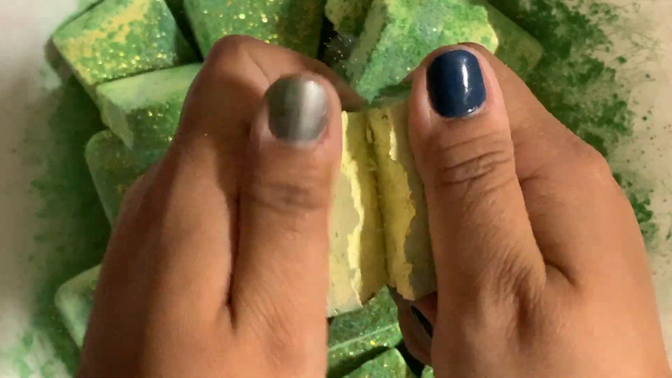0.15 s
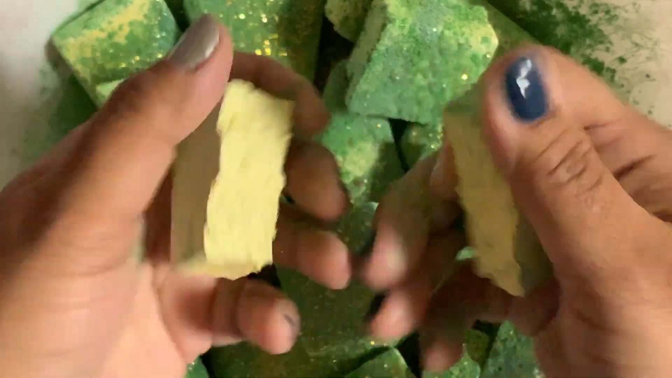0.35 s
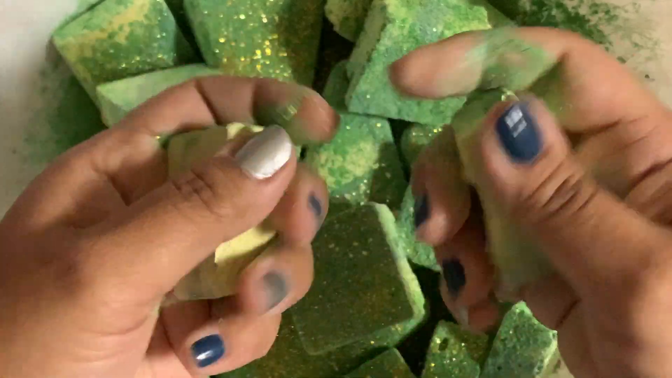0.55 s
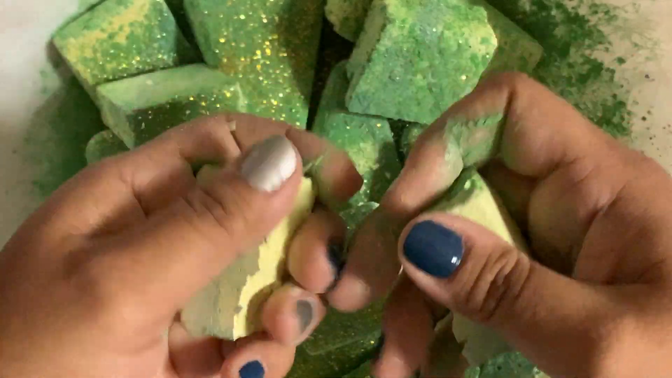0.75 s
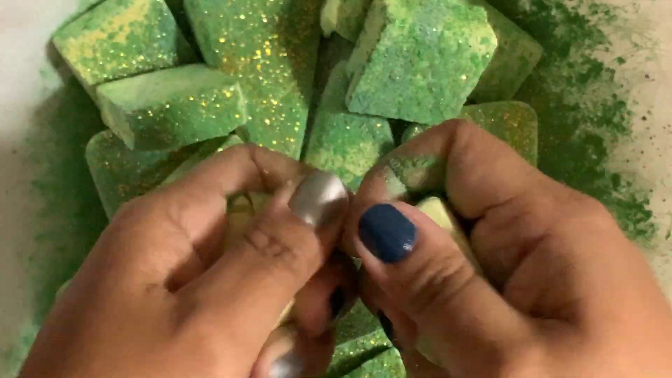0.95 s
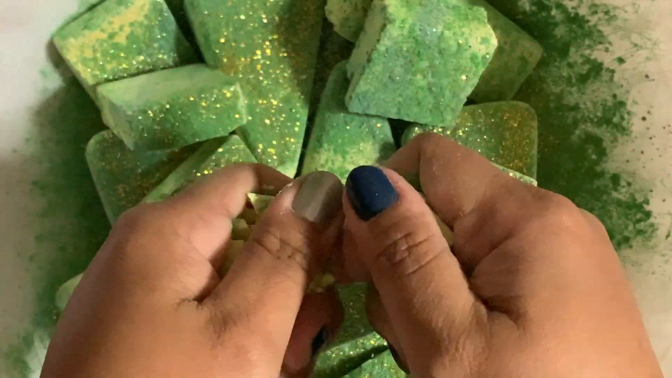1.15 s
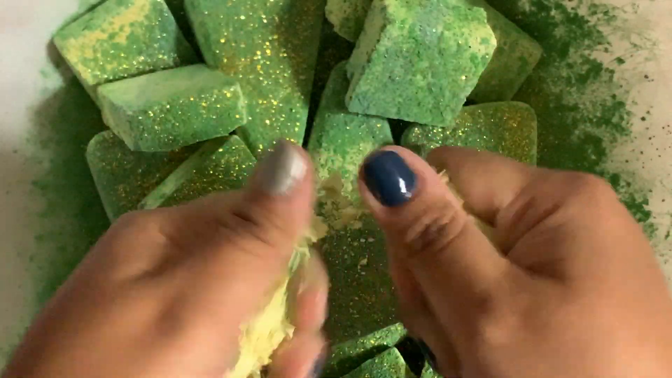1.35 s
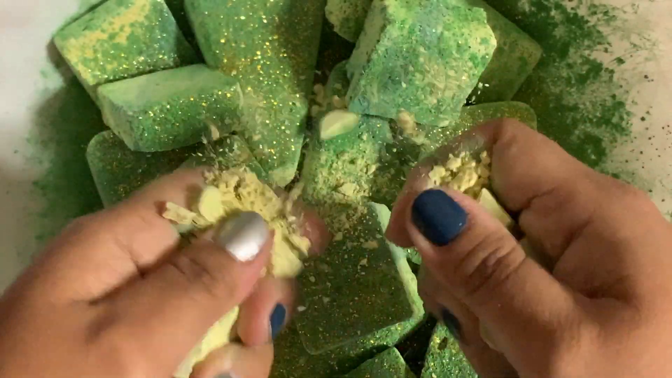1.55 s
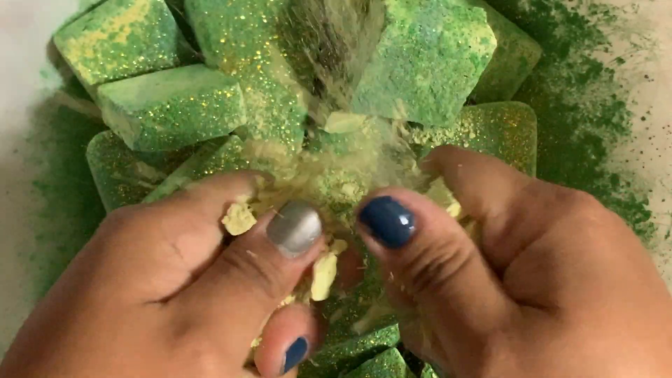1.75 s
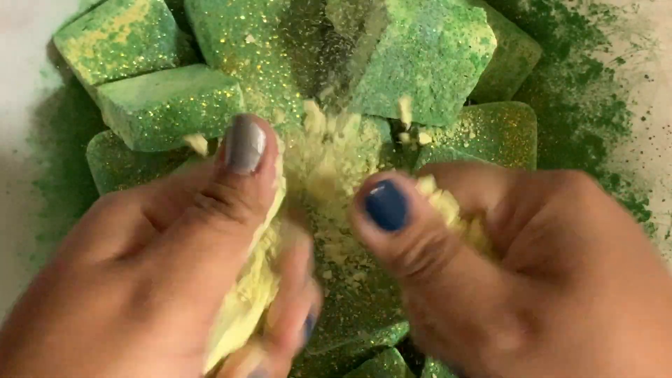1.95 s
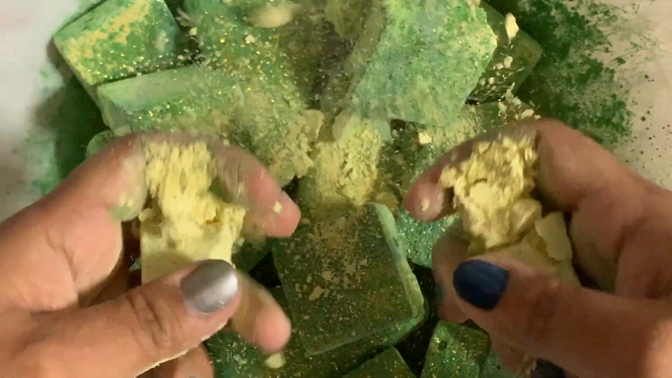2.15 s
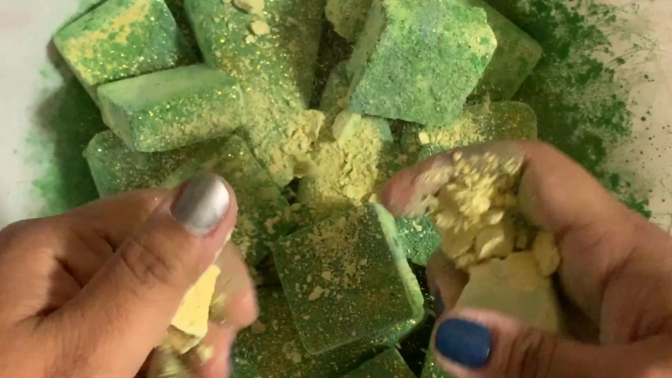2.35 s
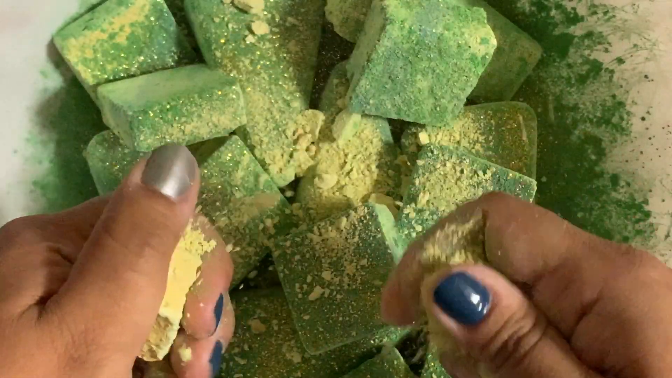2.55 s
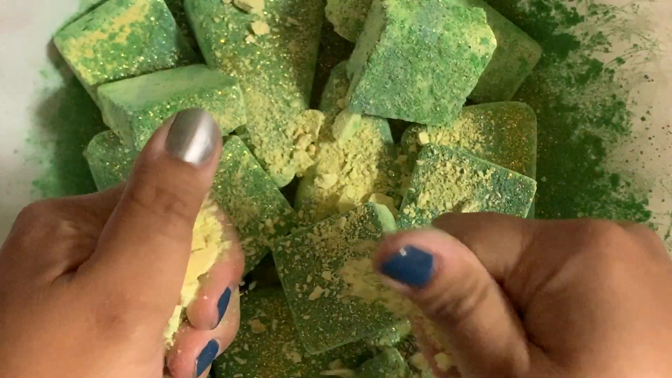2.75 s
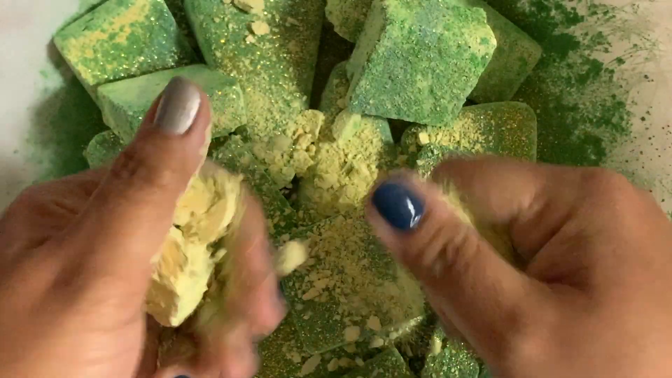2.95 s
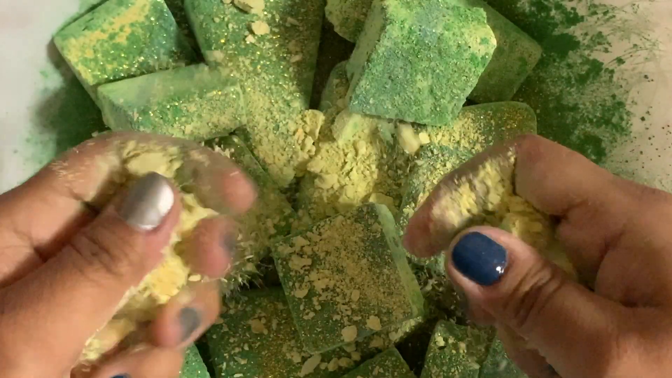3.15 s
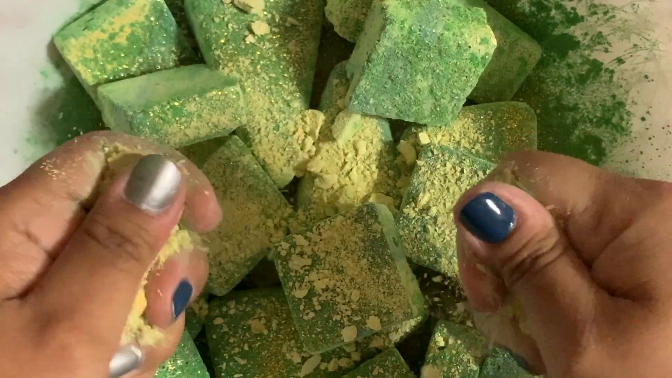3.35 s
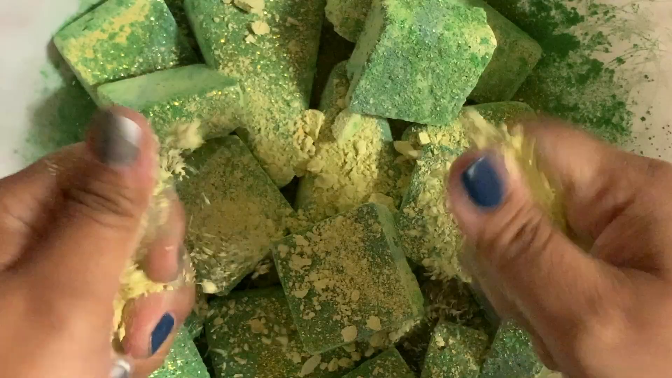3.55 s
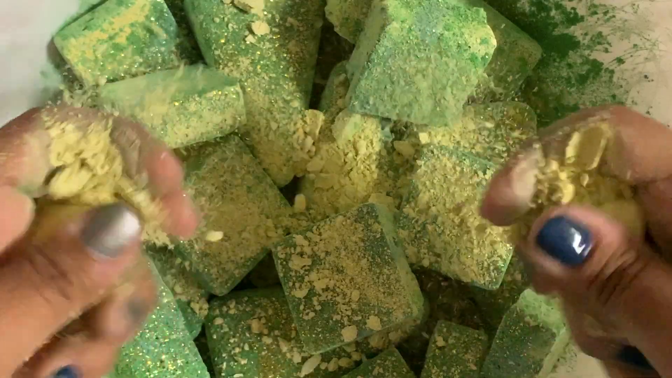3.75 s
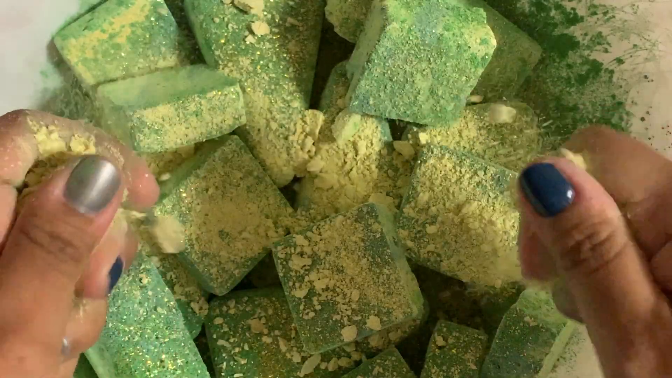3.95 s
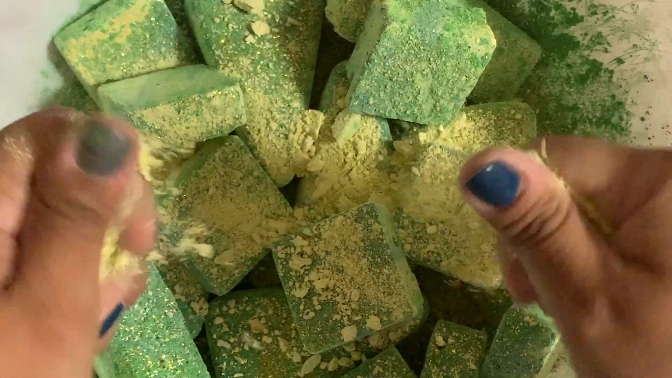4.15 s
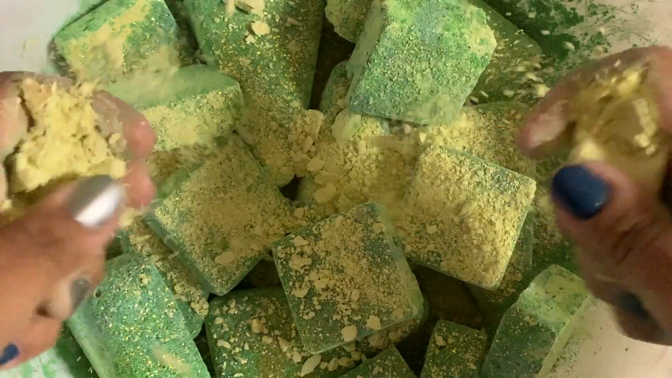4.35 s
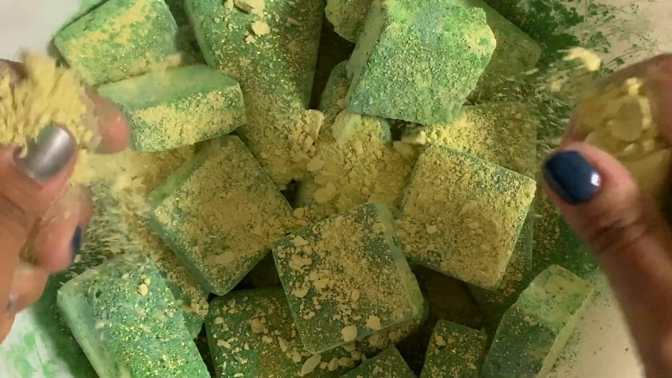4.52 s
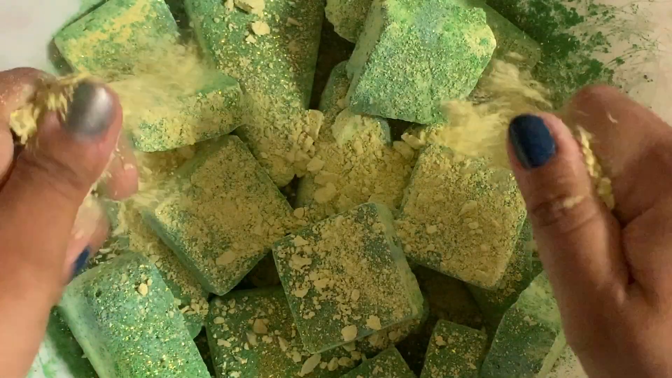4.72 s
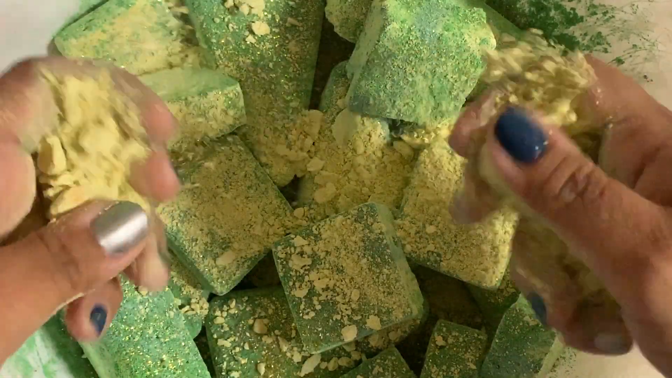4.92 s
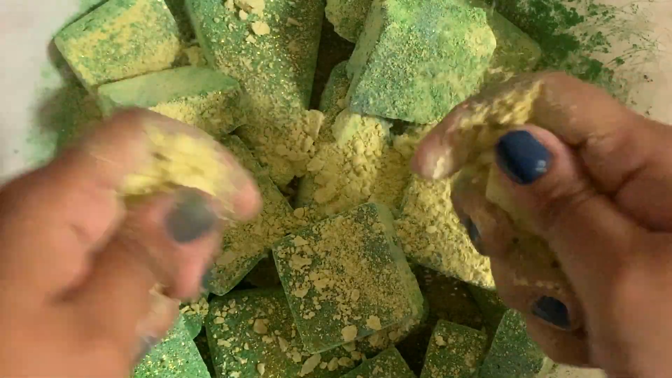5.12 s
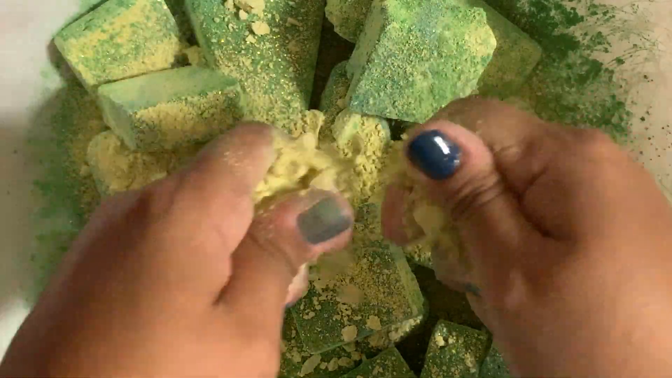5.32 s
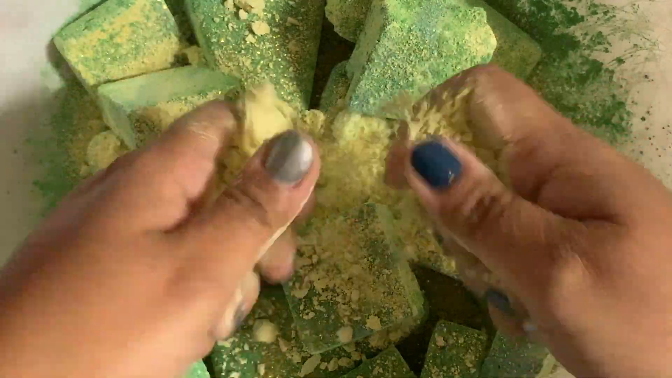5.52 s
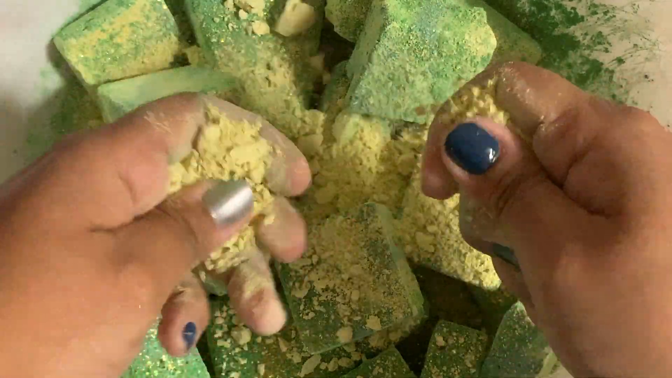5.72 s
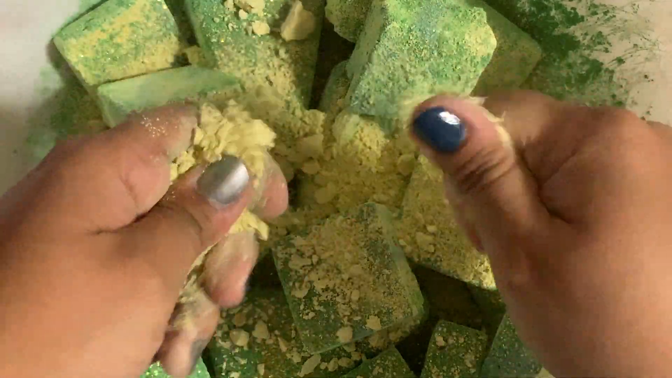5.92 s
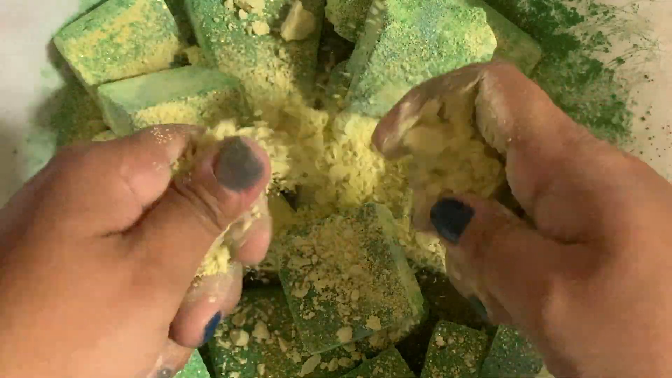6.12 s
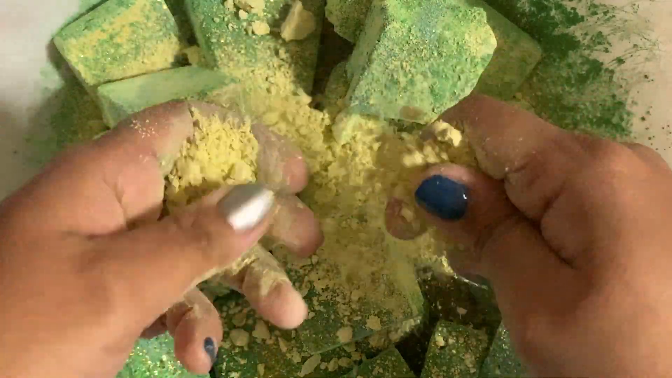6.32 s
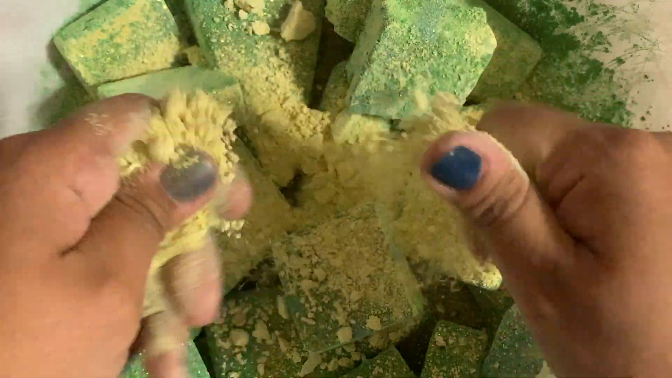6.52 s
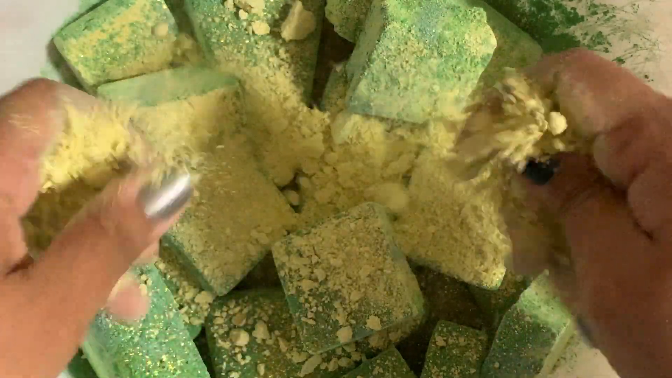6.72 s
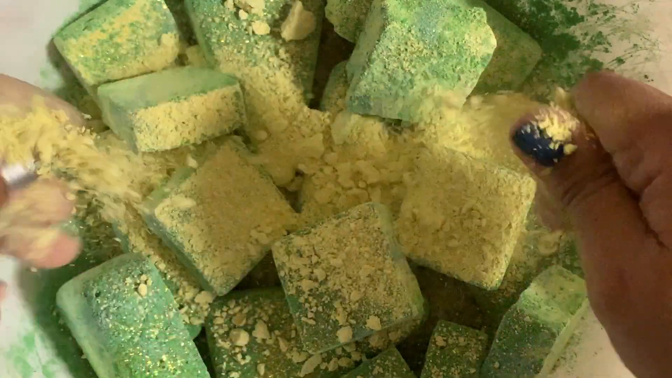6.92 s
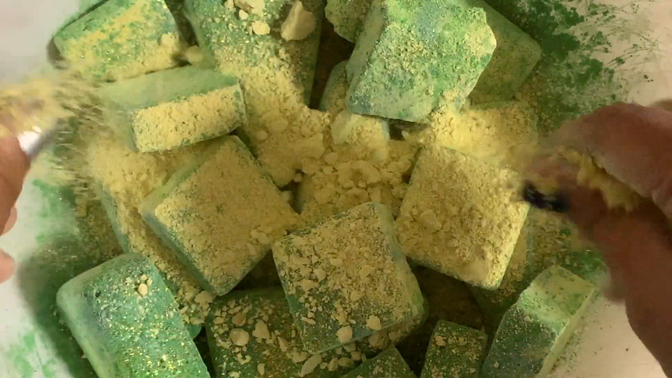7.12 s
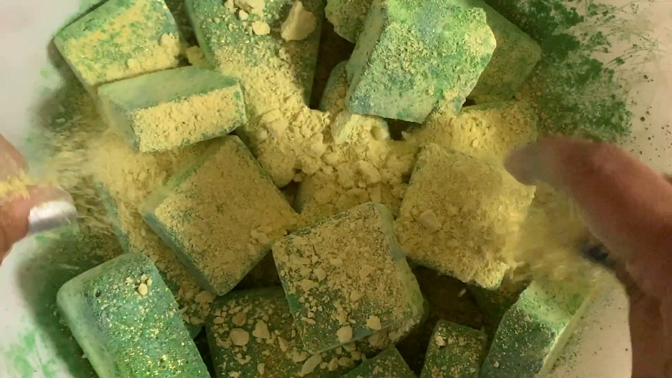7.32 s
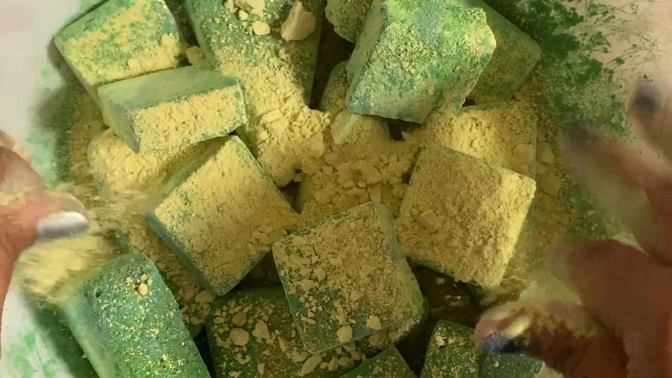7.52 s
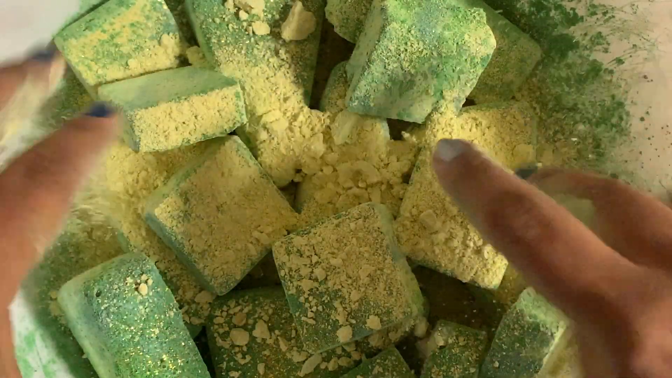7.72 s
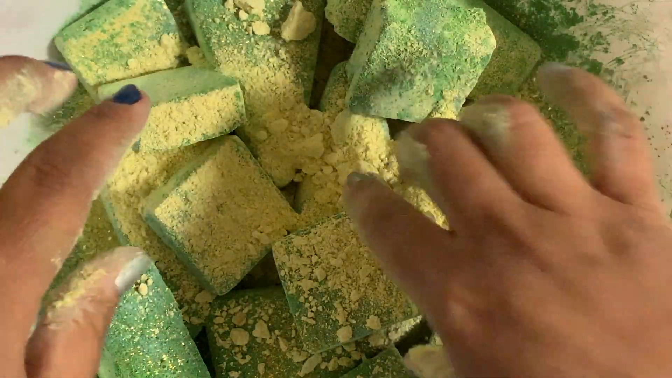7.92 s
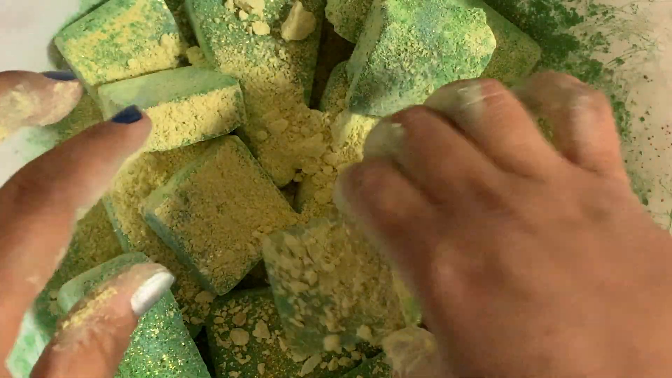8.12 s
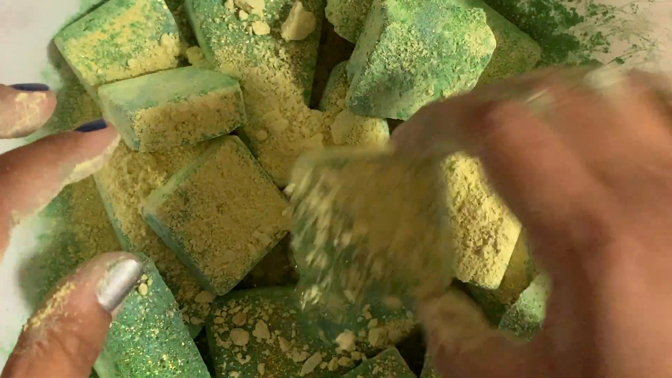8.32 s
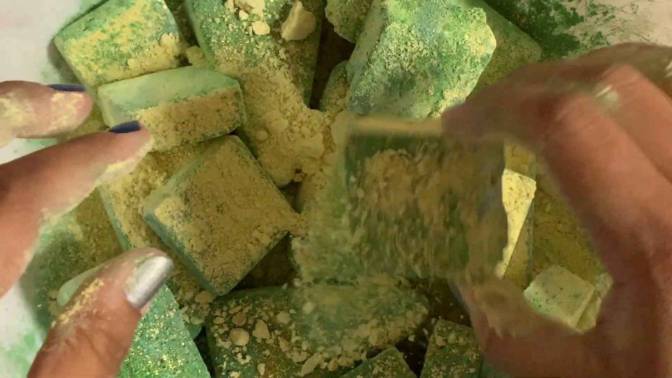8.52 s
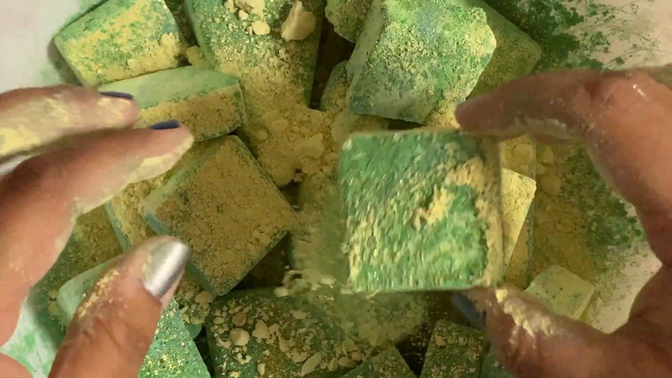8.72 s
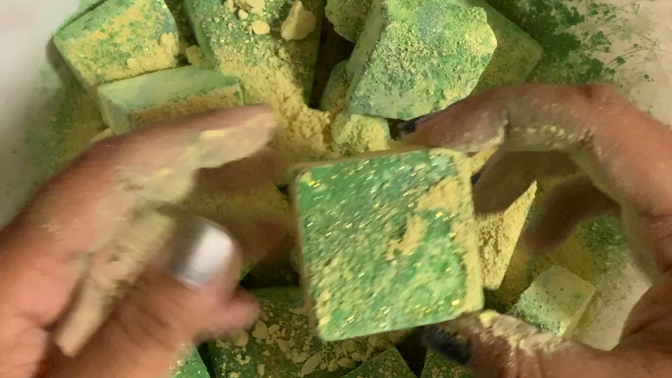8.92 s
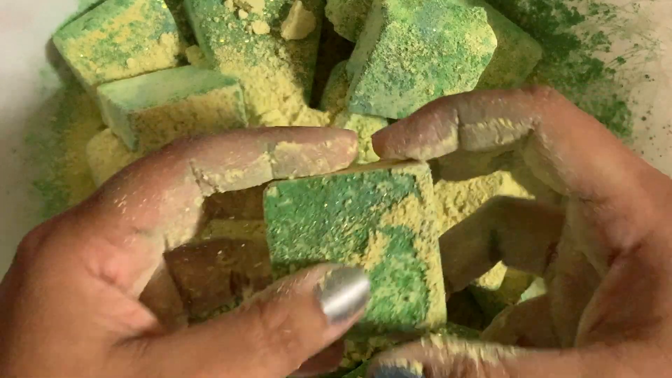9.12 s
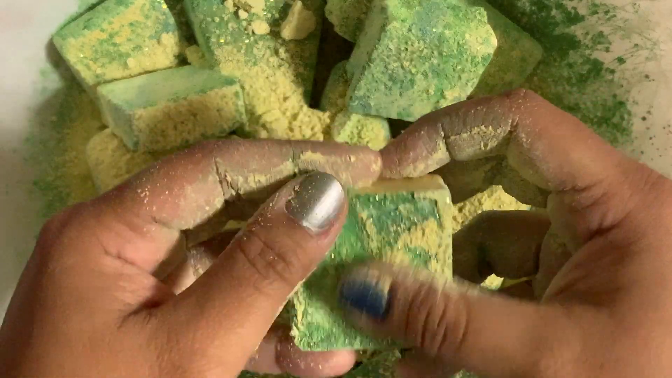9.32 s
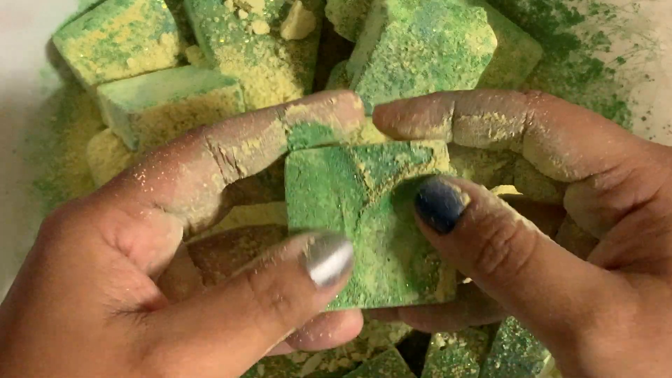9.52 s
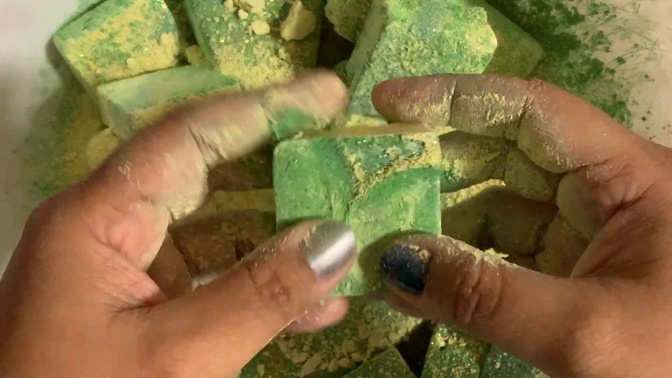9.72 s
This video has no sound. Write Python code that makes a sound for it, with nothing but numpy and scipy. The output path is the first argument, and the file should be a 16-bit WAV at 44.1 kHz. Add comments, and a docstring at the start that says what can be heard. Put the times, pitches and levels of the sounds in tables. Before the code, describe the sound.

Dry chalk is crushed in two fists, crackling and trickling as crumbs, before a quiet lift and smooth rubbing of another block, appliance hum behind.

```python
"""Crushing soft chalk by hand

Two hands snap and crush a soft chalk block over a tray of blocks, close to one microphone in a small room.
Cracks are damped rings with treble snaps, thuds are low damped modes, crumbs and powder are clicks and puffs.
A thumb rubs a whole block at the start and the end (noise through resonances); a faint squeak glides.
Behind: appliance tones over room noise, and low bumps through the table (swelling low noise)."""
import sys
import numpy as np
from scipy import signal
from scipy.fft import rfft, irfft
from scipy.io import wavfile

SR = 44100
rng = np.random.default_rng(int(sys.argv[2]) if len(sys.argv) > 2 else 0)


def log_audio(samples):
    """Write samples as a 16-bit WAV file to the path given in sys.argv[1]."""
    # one column per channel
    frames = np.atleast_2d(samples).T
    # limit to full scale, then quantise
    limited = np.clip(frames, -1, 1)
    pcm = np.round(limited * 32767).astype(np.int16)
    wavfile.write(sys.argv[1], SR, pcm)


N = 430857


def amp(db):
    """Decibels to gain."""
    return 10 ** (np.asarray(db) / 20)


def rms_one(x):
    """Scale to rms 1."""
    return x / np.sqrt(np.mean(x ** 2) + 1e-20)


def in_time(rows):
    """Columns of a curve table, interpolated at every sample."""
    t_s, *columns = np.transpose(rows)
    return [np.interp(np.arange(N) / SR, t_s, column) for column in columns]


def colour(x, spectrum):
    """Shape x by a spectrum of (f/Hz, level/dB) points, log-interpolated in f; rms 1."""
    hz = np.maximum(np.arange(N // 2 + 1) * SR / N, 1)
    point_hz, point_db = np.array(spectrum).T
    gain = amp(np.interp(np.log(hz), np.log(point_hz), point_db))
    return rms_one(irfft(rfft(x) * gain, N))


def drift(rate_hz):
    """Slow random wander of rms 1: noise at SR / 40 through a double pole, interpolated."""
    r = np.exp(-80 * np.pi * rate_hz / SR)
    noise = rng.standard_normal(N // 40 + 2002)
    slow = signal.lfilter([1], [1, -2 * r, r * r], noise)[2000:]   # drop the settling
    return np.interp(np.arange(N) / 40, np.arange(len(slow)), rms_one(slow))


def resonance(x, hz, width_hz):
    """Two-pole band with gain 1 on top."""
    r = np.exp(-np.pi * width_hz / SR)
    numerator = np.array([1, 0, -1]) * (1 - r * r) / 2
    return signal.lfilter(numerator, [1, -2 * r * np.cos(2 * np.pi * hz / SR), r * r], x)


def butter2(x, hz, kind):
    """Butterworth filter of design order 2."""
    return signal.sosfilt(signal.butter(2, hz, kind, fs=SR, output="sos"), x)


def grains(per_s, spread_db):
    """Random clicks of either sign and uneven size, exponential in dB."""
    sizes = amp(spread_db * np.minimum(rng.exponential(1, N), 5)) * rng.choice([-1, 1], N)
    return sizes * (rng.random(N) < per_s / SR) + 1e-18


def gesture(t_full_s, hold_s, level_db, on_db_per_s, off_db_per_s):
    """Gain of efforts that build up to their level, hold it and ease off; powers add."""
    t = np.arange(0, N + 64, 64)[:, None] / SR
    before_s = np.maximum(t_full_s - t, 0)
    after_s = np.maximum(t - t_full_s - np.abs(hold_s), 0)
    short_db = on_db_per_s * before_s + off_db_per_s * after_s
    power = np.sum(amp(level_db - np.minimum(short_db, 200)) ** 2, axis=1)
    return np.interp(np.arange(N) / SR, t[:, 0], np.sqrt(power))


def appliance():
    """Steady tones that waver a little in level and phase, over coloured room noise."""
    # appliance tones: f/Hz, level/dB rms before wavering
    hum = [(82.3, -47.5), (119.9, -52), (165, -61), (209.8, -43), (329.5, -62)]
    # room noise spectrum: f/Hz, relative density/dB per Hz
    air = [(20, -3.5), (34, -9.5), (46, -4.5), (60, -8.5), (72, -19), (200, -16), (330, -19), (730, -32.5),
           (950, -28), (1500, -43), (2000, -48), (7700, -50), (16000, -59.5)]
    air_db = -43.5
    t = np.arange(N) / SR
    tones = np.zeros(N)
    for hz, level_db in hum:
        gain = np.sqrt(2) * amp(level_db + 1.5 * drift(4.5))
        phase = 0.49 * drift(3.2) + 2 * np.pi * rng.random()
        tones += gain * np.sin(2 * np.pi * hz * t + phase)
    return tones + amp(air_db) * colour(rng.standard_normal(N), air)


def room(x, t60_s, wet_db):
    """A short diffuse tail of decaying noise, duller than the direct sound."""
    t = np.arange(SR // 3) / SR
    tail = rng.standard_normal(len(t)) * amp(-60 * t / t60_s) * (t > .004)
    tail = signal.lfilter([.5], [1, -.5], tail)
    return amp(wet_db) * signal.fftconvolve(x, tail / np.sqrt(np.sum(tail ** 2)))[:N]


def bumps():
    """Soft low rumbles through the table: noise in a broad low resonance, swelling and fading."""
    # table bumps: start t/s, nominal level/dB, f/Hz, length/s
    bump_rows = [(1.003, -35, 40.4, 0.12), (2.074, -35, 45, 0.097), (3.847, -24, 46, 0.2),
                 (6.126, -41, 40, .1), (7.672, -25.5, 35.5, 0.17), (7.953, -31, 48, 0.15)]
    out, t = np.zeros(N), np.arange(N) / SR
    shake = rng.standard_normal(N)
    for start_s, level_db, hz, length_s in bump_rows:
        swell = np.sin(np.pi * np.clip((t - start_s) / length_s, 0, 1))
        rumble = resonance(resonance(shake, hz, 0.38 * hz), hz, 0.38 * hz)
        out += amp(level_db - 4.5) * swell * rms_one(rumble)
    return out


def squeak():
    """A finger squeaks faintly as the block is lifted: a thin, unsteady gliding tone."""
    # glide: t/s, f/Hz, level/dB, both before wavering
    glide = [(8.33, 4300, -88), (8.4, 4450, -72), (8.55, 4750, -72), (8.66, 4670, -86)]
    hz, level_db = in_time(glide)
    phase = 2 * np.pi * np.cumsum(hz + 40 * drift(40)) / SR
    return amp(level_db + 4.0 * drift(25)) * np.sin(phase)


def rubbing():
    """Skin friction, dense and smooth, excites the block's resonances; the grip damps each one by turns."""
    # thumb strokes over a whole block: t at full speed/s, hold/s, level/dB
    strokes = [(0.218, 0.04, -43), (0.362, 0.061, -43.5), (0.487, 0, -42.5), (.555, .0, -41),
               (.63, 0.0084, -50.5), (0.67, 0.13, -50), (8.19, .0, -51.5), (8.33, 0.011, -55.5),
               (9.091, 0.039, -50), (9.167, 0.05, -44.5), (9.264, 0.34, -42), (9.684, 0.052, -44)]
    # block resonances: f/Hz, width/Hz, relative level/dB before wandering
    block = [(1520, 230, -9), (2650, 150, -1), (4360, 660, -2), (5500, 150, 6.5), (6520, 220, 0),
             (7980, 170, 7), (12200, 430, -11)]
    friction = rng.standard_normal(N) * amp(0.96 * drift(59))
    modes = np.zeros(N)
    for k, (hz, width_hz, level_db) in enumerate(block):
        mode = resonance(friction, hz, width_hz)
        modes += (-1) ** k * amp(level_db + 2.8 * drift(11)) * mode
    broad = resonance(friction, 6900, 5200) + 0.35 * resonance(friction, 2430, 2000)
    stroke = gesture(*np.transpose(strokes), on_db_per_s=356, off_db_per_s=408)
    return stroke * rms_one(rms_one(modes) + 1.1 * rms_one(broad))


def effort():
    """Fists squeeze, powder trickles between: gains of squeezed crumbs, all crumbs, all coarse lumps."""
    # fists squeezing: t at full force/s, hold/s, crumbs level/dB, coarse lumps level/dB
    squeezes = [(.046, 0.018, -51, -47.5), (.83, 0.018, -47.5, -55), (0.974, 0.062, -40.5, -42.5),
                (1.484, 0.0019, -47, -41), (1.67, 0, -43, -47), (1.834, 0.14, -39, -45),
                (2.123, 0.15, -42, -39.5), (2.72, .0, -40, -44), (2.934, 0, -43, -43),
                (3.136, 0.099, -44.5, -43), (3.265, 0.23, -44.5, -46.5), (3.66, .0, -62, -40),
                (3.755, 0.049, -41.5, -39), (3.927, 0.035, -34.5, -39), (4.113, 0.0059, -41.5, -49),
                (4.357, 0.053, -40.5, -40.5), (4.48, 0.13, -39.5, -44), (4.655, 0.071, -45, -41.5),
                (4.984, 0.1, -45.5, -48), (5.225, 0.071, -46, -46), (5.416, 0.023, -44.5, -62),
                (5.664, 0.031, -48.5, -43.5), (5.907, 0.00074, -41, -66), (6.53, 0.0022, -42, -40),
                (6.7, 0, -42, -40.5), (6.876, 0, -50, -43), (6.96, 0, -67, -53), (7.315, 0.021, -37.5, -40),
                (7.495, 0.086, -39, -59), (7.76, .0, -49, -43), (8.59, 0.013, -55, -55),
                (8.7, 0.046, -57, -58)]
    # trickle under the squeezes: t/s, crumbs level/dB, coarse lumps level/dB
    trickle = [(0, -78, -63), (.15, -72, -69), (.9, -65, -61), (1.15, -40, -45), (1.38, -48.5, -60),
               (1.6, -41.5, -44), (2.45, -45, -44), (3.05, -46.5, -52), (3.9, -47, -62), (4.25, -51, -60),
               (4.85, -41.5, -52), (5.55, -52.5, -46.5), (6.05, -45.5, -46.5), (7.2, -41, -51),
               (7.7, -48, -51.5), (7.971, -72, -66.5), (9.77, -69.5, -68)]
    build_db_per_s, ease_db_per_s = 252, 118   # builds fast, eases off more slowly
    t_full_s, hold_s, *levels_db = np.transpose(squeezes)
    fine, coarse = [gesture(t_full_s, hold_s, level_db, build_db_per_s, ease_db_per_s)
                    for level_db in levels_db]
    fine_db, coarse_db = in_time(trickle)
    return fine, np.hypot(fine, amp(fine_db)), np.hypot(coarse, amp(coarse_db))


def small_cracks(squeeze):
    """Rows for cracks() at random moments, strength following the squeeze gain with random spread."""
    per_s, over_crumbs_db, spread_db = 30, 16, 3.5
    low_hz, high_hz = 1600, 4670
    snap_db, snap_spread_db = -10, 8
    count = int(per_s * N / SR)
    when, pitch = rng.random((count, 2)).T
    size, snap = rng.standard_normal((count, 2)).T
    t_s = .01 + when * (N / SR - .02)
    squeeze_db = 20 * np.log10(squeeze[(t_s * SR).astype(int)])
    level_db = squeeze_db + over_crumbs_db + spread_db * size
    ring_hz = low_hz * (high_hz / low_hz) ** pitch
    return list(np.transpose([t_s, level_db, ring_hz, snap_db + snap_spread_db * snap]))


def thuds():
    """A soft push by a chunk: two damped low modes, then a weaker inverted knock as it settles."""
    # chunks shifting in the palms or dropping on the blocks: t/s, nominal level/dB, f/Hz
    thud_rows = [(0.0362, -13, 630), (0.821, -31.5, 520), (0.8677, -25, 570), (0.9428, -21, 570),
                 (0.9557, -27, 447), (0.9757, -18.5, 640), (1.0036, -17.5, 935), (1.02, -13.5, 805),
                 (1.1375, -19.5, 935), (1.4726, -21, 500), (1.6732, -13, 660), (1.82, -9, 725),
                 (1.844, -18.5, 503), (1.8712, -30, 640), (1.9337, -12.5, 1020), (2.1094, -24, 320),
                 (2.123, -24.5, 437), (2.159, -23, 526), (2.198, -13, 650), (2.2505, -22, 627),
                 (2.2934, -16.5, 885), (2.7164, -21.5, 566), (2.9647, -22.5, 544), (3.129, -27, 580),
                 (3.2696, -20.5, 680), (3.3134, -23.5, 675), (3.3492, -18.5, 870), (3.4649, -18.5, 920),
                 (3.6479, -22.5, 382), (3.727, -19, 520), (3.7742, -21, 605), (3.9852, -20, 660),
                 (4.47, -23, 716), (4.502, -16.5, 905), (4.6344, -24.5, 634), (4.6891, -24, 283),
                 (4.7152, -28, 363), (5.2081, -16.5, 650), (5.649, -19.5, 434), (5.6626, -24.5, 536),
                 (5.6951, -24, 366), (6.42, -31.5, 620), (6.536, -25.5, 700), (6.736, -33.5, 333),
                 (6.77, -28, 610), (6.952, -26.5, 676), (7.3593, -21.5, 640)]
    settle_s, settle_db = .012, -11   # mean delay, level re first knock
    out, t = np.zeros(N + 4096), np.arange(2048) / SR
    for (t_s, level_db, hz), (deep, late) in zip(thud_rows, rng.random((len(thud_rows), 2))):
        low_hz = hz * (0.3 + 0.68 * deep)
        body = np.sin(2 * np.pi * hz * t) * np.exp(-t * hz / 1.03)
        body += 0.84 * np.sin(2 * np.pi * low_hz * t) * np.exp(-t * low_hz / 0.42)
        onset = 1 - np.exp(-t / 0.00047)
        knock = amp(level_db + 5) * onset * body
        at = round(t_s * SR)
        again = at + round(settle_s * (.5 + late) * SR)
        out[at:at + 2048] += knock
        out[again:again + 2048] -= amp(settle_db) * knock
    return out[:N]


def crumb_ticks(clump):
    """Crumbs tick at all pitches: each click rings one of ten resonances."""
    clicks, dealt = grains(900 * clump, spread_db=3.0), rng.integers(0, 10, N)
    ticks = np.zeros(N)
    for k, hz in enumerate(np.geomspace(1000, 9000, 10)):
        ticks += resonance(clicks * (dealt == k), hz, 0.24 * hz) / hz ** 0.21
    return butter2(ticks, 9000, "low")


def powder_puffs(clump):
    """Powder puffs start sharply and die away, each range of grain size in its own time."""
    # powder spectrum: f/Hz, relative density/dB per Hz
    powder_spectrum = [(600, -5), (1300, -24.5), (2500, -4.5), (4000, -6), (7000, -6.5), (10000, -8.5),
                       (16000, -29.5)]
    hiss, powder = colour(rng.standard_normal(N), powder_spectrum), np.zeros(N)
    fade = np.exp(-1 / (0.0054 * SR))
    shared = np.abs(grains(60 * clump, spread_db=3.5))   # puffs common to all bands
    for band_hz in ([700, 2200], [2200, 4500], [4500, 8500], [8500, 17000]):
        starts = shared + np.abs(grains(60 * clump, spread_db=6.0))
        puffs = rms_one(signal.lfilter([1], [1, -fade], starts))
        gain = (0.86 + 0.5 * puffs) * amp(2.8 * drift(8.0))
        powder += gain * butter2(hiss, band_hz, "band")
    return powder


def crumbling(crumbs_gain, coarse_gain):
    """Crumb ticks and powder puffs cluster together; coarse lumps are clicks in low resonances."""
    clump = amp(5.0 * drift(30))
    fine = 0.53 * rms_one(crumb_ticks(clump)) + 0.54 * rms_one(powder_puffs(clump))
    lumps = rms_one(grains(350 * amp(4.9 * drift(18)), spread_db=4.5))
    lumps = lumps + 0.27 * rng.standard_normal(N)   # on a soft rustle
    coarse = resonance(lumps, 535, 200) - 0.25 * resonance(lumps, 1500, 600) + resonance(lumps, 306, 180)
    return crumbs_gain * fine + coarse_gain * rms_one(coarse)


def cracks(rows):
    """Each break rings a few cycles, snaps in the treble, sheds splinters and comes back from the tray."""
    out, t = np.zeros(N + 4096), np.arange(2048) / SR
    chance = rng.random((len(rows), 3))
    noise = rng.standard_normal((len(rows), 2, 2048))
    bright = butter2(noise[:, 0], [5500, 11000], "band")
    rise = 1 - np.exp(-t / 0.000081)   # soft chalk: the break takes a moment to open
    for row, (cup, late, strong), hiss, white in zip(rows, chance, bright, noise[:, 1]):
        t_s, level_db, hz, snap_db = row
        ring = np.sin(2 * np.pi * hz * t) * np.exp(-t * hz / 0.54)
        cup_hz = 1300 + 550 * cup   # the cupped hands add a ring of their own
        ring += .5 * np.sin(2 * np.pi * cup_hz * t) * np.exp(-t / 0.00063)
        snap = amp(snap_db) * hiss * np.exp(-t / 0.00042)
        # small lumps shed brighter splinters
        grit = rms_one(resonance(resonance(white, hz, 1.01 * hz), hz, 1.01 * hz))
        splinters = grit * (0.45 * np.exp(-t / 0.0013) + 0.035 * np.exp(-t / 0.0069))
        blow = amp(level_db + 1.5) * (rise * (ring + splinters) + snap)
        echo = (0.11 + .5 * strong) * signal.lfilter([.6], [1, -.4], blow)   # duller, off the tray
        at = round((t_s - .0003) * SR)
        back = at + round((0.0016 + .0012 * late) * SR)
        out[at:at + 2048] += blow
        out[back:back + 2048] += echo
    return butter2(out[:N], 1150, "high")   # small lumps radiate little bass


def scene():
    """Everything at the microphone; the air between hands and tray rings with the chalk."""
    # lumps cracking: t/s, nominal level/dB, ring f/Hz, treble snap re ring/dB
    crack_rows = [(0.0366, -3, 1730, -5), (0.626, -30.5, 3480, 10), (0.7173, -31.5, 1600, 8),
                  (0.822, -25, 5060, 11), (0.8698, -14, 3550, -1), (0.889, -29, 3520, -3),
                  (0.9458, -10, 2060, -4), (0.9568, -20, 3420, 4), (0.9786, -12.5, 1430, 1.5),
                  (1.0031, -17, 2460, 3), (1.022, -8.5, 1770, -16), (1.0294, -9, 3330, -20),
                  (1.0408, -11.5, 2320, -27), (1.0504, -5.5, 2650, -24), (1.0727, -19, 2210, -26),
                  (1.1405, -16, 3970, -4), (1.4615, -19, 3130, 2), (1.6749, -5.5, 3320, -0.5),
                  (1.7145, -21, 2730, 0), (1.817, -4.5, 2180, -12), (1.8447, -13, 2970, -2),
                  (1.8755, -14, 2420, -11), (1.8822, -18.5, 6170, 12), (1.9089, -7, 1690, -28),
                  (1.9363, -3.5, 2670, -31), (2.0291, -14, 2470, -14), (2.1034, -10, 2050, -10),
                  (2.1121, -18.5, 5010, 6.5), (2.1529, -22, 4440, 2), (2.1717, -5.5, 2400, -14),
                  (2.1856, -15, 3030, -6), (2.1913, -3, 2190, -14), (2.1978, 4.5, 1710, -37),
                  (2.2094, -8.5, 2290, -19), (2.2184, -20, 2600, -15), (2.2393, -18, 3020, -4),
                  (2.2448, -15, 1620, -18), (2.2511, 1, 2520, -33), (2.2846, -17, 1720, -17),
                  (2.2947, -10, 1840, -33), (2.348, -21, 1720, -33), (2.477, -20.5, 3840, 2),
                  (2.602, -21, 4530, -7), (2.707, -17, 2980, -2), (2.7162, -15.5, 2300, 0),
                  (2.8917, -12, 3340, -24), (2.9295, -18, 2700, -14), (2.9635, -18, 2570, -4),
                  (3.0483, -22.5, 3060, -2), (3.103, -9.5, 2000, -41), (3.1248, -9, 1830, -34),
                  (3.2642, -11, 1800, -8), (3.314, -18.5, 4040, -5), (3.3493, -12, 2400, -30),
                  (3.647, -21, 2900, -15), (3.6728, -19, 2360, -28), (3.7753, -9, 1340, -30),
                  (3.8121, -28, 2980, -8), (3.843, -15, 3250, -9), (3.876, -16.5, 2960, -6),
                  (3.8955, -21, 2750, -11), (3.9479, -22, 2680, -19), (3.9695, -24.5, 3520, 1),
                  (3.9861, -13, 3640, -9), (4.0412, -32, 3180, -9), (4.3212, -20, 3250, -7),
                  (4.3645, -17, 1950, -21), (4.4723, -4.5, 1920, -41), (4.4898, -21, 2460, -17),
                  (4.5184, -16.5, 2650, -12), (4.5441, -11, 2500, -34), (4.589, -15.5, 3380, -22),
                  (4.635, -15, 3600, -8), (4.6879, -23, 3300, -14), (4.7107, -21, 3150, -14),
                  (4.8915, -11.5, 2660, -11), (5.0204, -19.5, 3180, 1), (5.0457, -26, 2500, 5),
                  (5.071, -1, 2340, -9), (5.1143, -20, 1690, -19), (5.1234, -15, 2500, -24),
                  (5.2105, -13.5, 1900, 2), (5.2234, -16, 2700, -19), (5.4678, -11.5, 2520, -20),
                  (5.5901, -20, 3100, -25), (5.6481, -16.5, 1580, -6), (5.6933, -23.5, 1890, 5.5),
                  (5.79, -32, 1490, -21), (6.2931, -26.5, 4400, -25), (6.389, -17.5, 2500, -25),
                  (6.5295, -22.5, 1490, -15), (6.548, -27, 1920, -12), (6.58, -26, 4400, -4),
                  (6.705, -12, 2150, -6), (6.7315, -15, 3620, 1.5), (6.768, -15, 2720, -23),
                  (6.883, -21.5, 3000, -20), (6.9012, -9, 2470, -21), (6.9152, -19, 2830, -20),
                  (7.0152, -5.5, 2700, -28), (7.0616, -19.5, 3270, 3), (7.2733, -22, 2340, -21),
                  (7.292, -20, 2820, -14), (7.3284, -10, 3370, -7), (7.345, -12, 3570, -21),
                  (7.3587, -6.5, 2560, -27), (7.3764, -15.5, 3040, -2), (7.3912, -22, 3770, 1),
                  (7.4856, -14, 2700, -38.5), (7.5154, -9.5, 3170, -12), (7.5335, -13, 2750, -13),
                  (7.548, -2, 2920, -16), (7.6095, -20, 2770, -46), (7.7484, -13, 5300, -11),
                  (7.756, -5, 2460, -4), (7.8908, -15.5, 2800, -23), (8.426, -41.5, 3600, -11),
                  (8.4666, -28.5, 3330, -10.5), (8.586, -32, 2100, 6), (8.6056, -36, 3500, 9),
                  (8.6265, -40, 3470, 5), (8.6982, -22, 2220, -24), (8.7463, -40.5, 3500, -24),
                  (8.8533, -36, 3470, -17.5)]
    tray_hz, tray_width_hz, tray_gain = 1390, 230, 0.25
    squeeze, crumbs_gain, coarse_gain = effort()
    chalk = cracks([*crack_rows, *small_cracks(squeeze)])
    chalk = chalk + thuds() + crumbling(crumbs_gain, coarse_gain)
    chalk = chalk + tray_gain * resonance(chalk, tray_hz, tray_width_hz)
    background = appliance() + bumps()
    hands = squeak() + rubbing()
    return (background + hands + chalk + room(chalk, t60_s=0.45, wet_db=-27.0))[None]


def record(dry):
    """Microphone response dip, clipping at full scale, steep top cut."""
    dip_hz, dip_width_hz, dip_depth = 1124, 150, 0.8
    stop_hz = 16500   # stopband edge, 60 dB down
    clipped = np.clip(dry - dip_depth * resonance(dry, dip_hz, dip_width_hz), -1, 1)
    return signal.sosfilt(signal.cheby2(14, 60, stop_hz, fs=SR, output="sos"), clipped)


dry = scene()
out = record(dry)
log_audio(out)
```